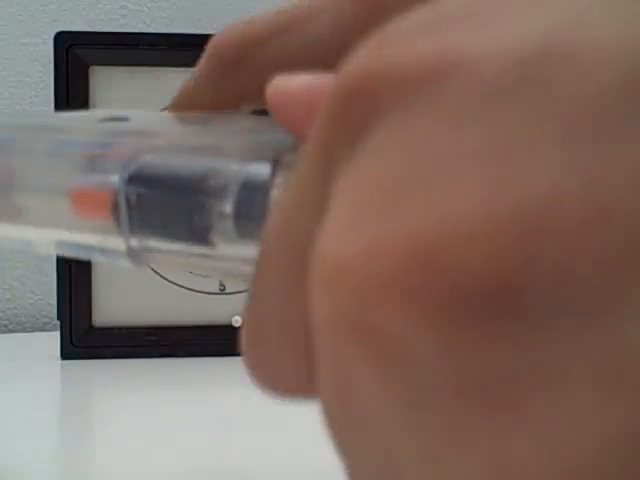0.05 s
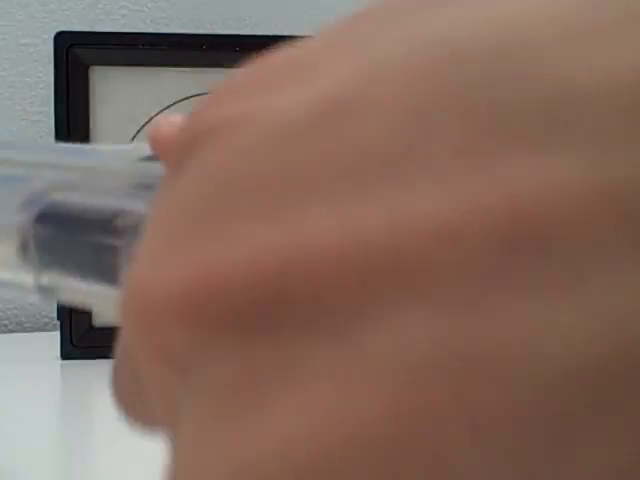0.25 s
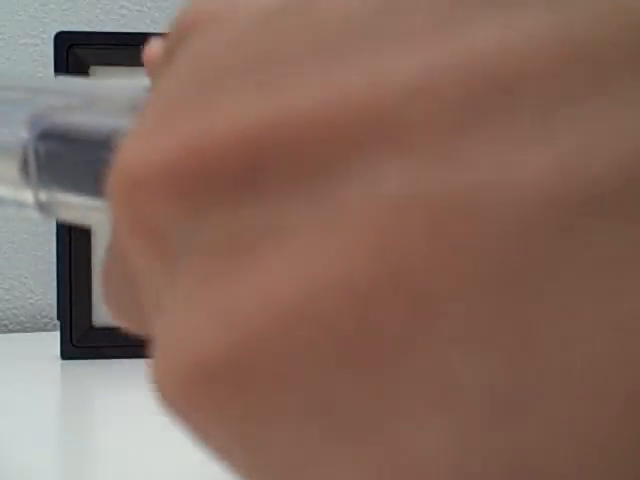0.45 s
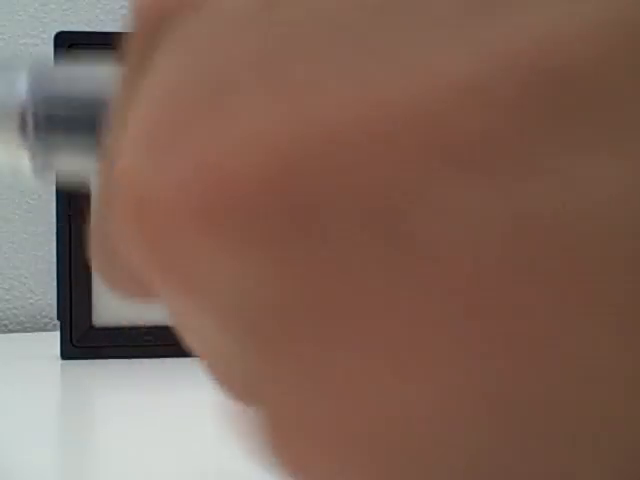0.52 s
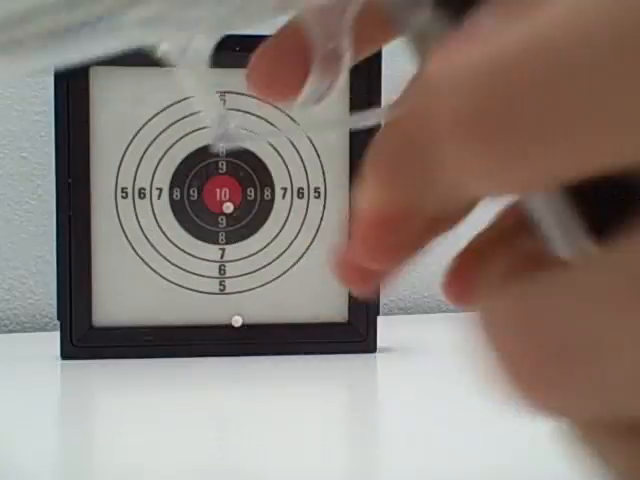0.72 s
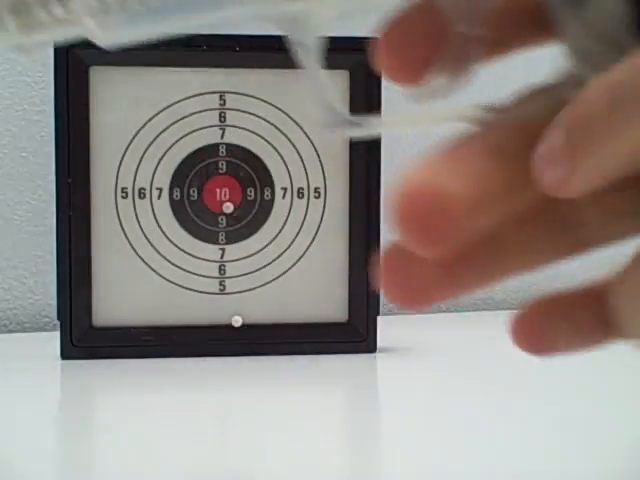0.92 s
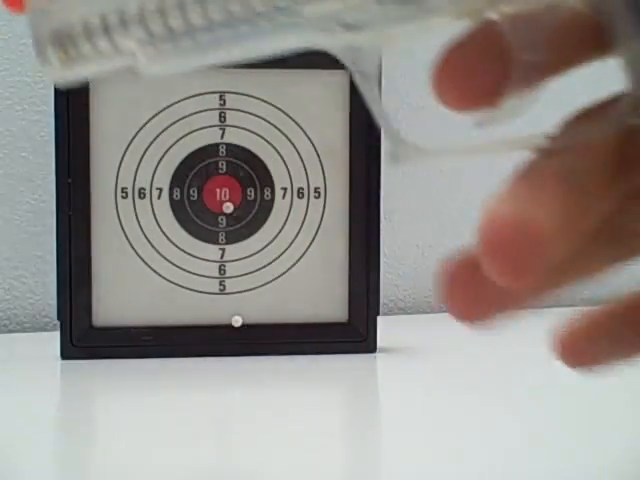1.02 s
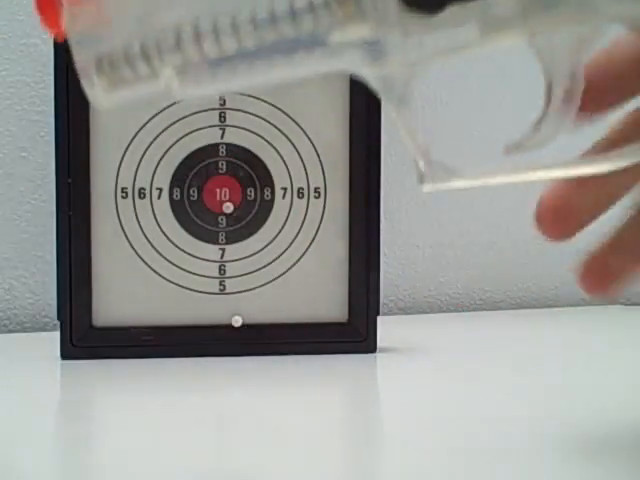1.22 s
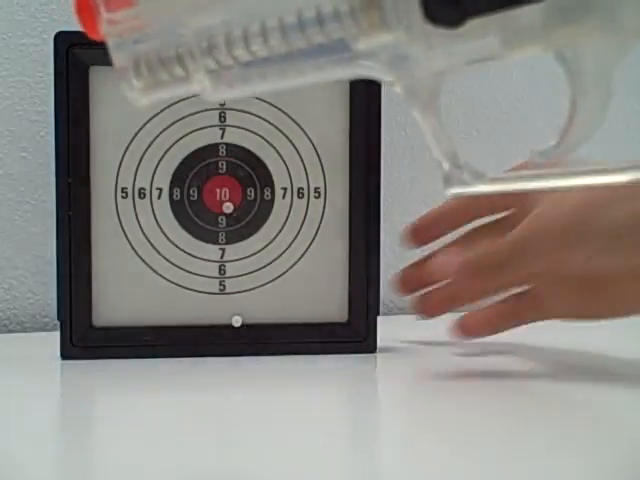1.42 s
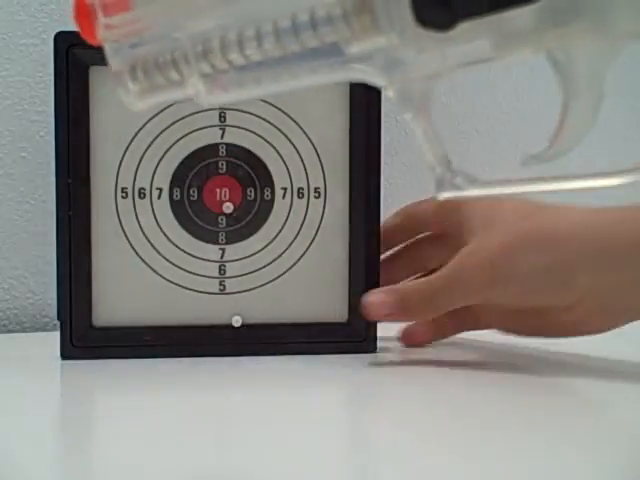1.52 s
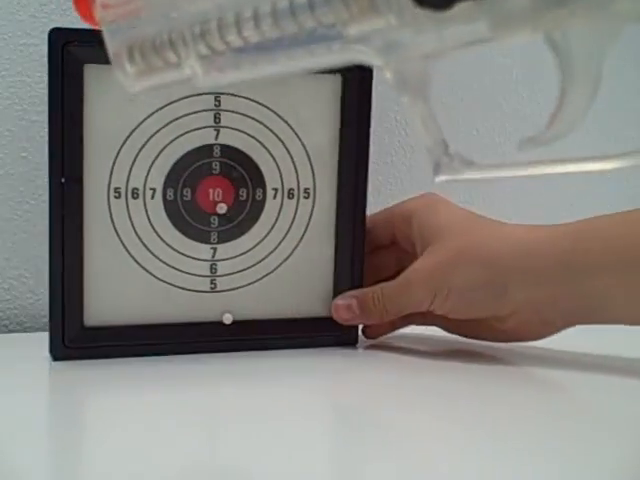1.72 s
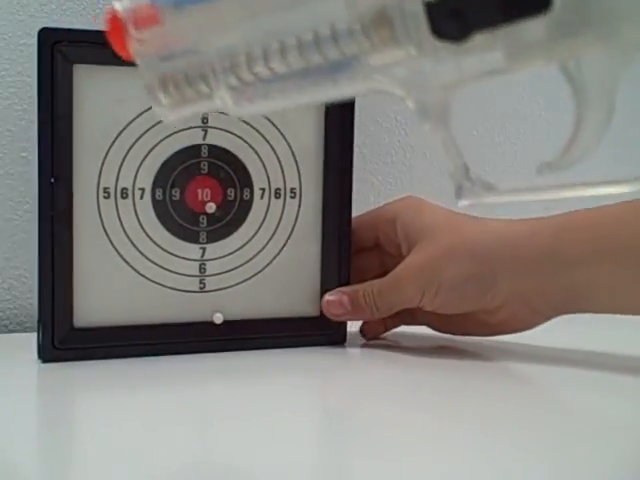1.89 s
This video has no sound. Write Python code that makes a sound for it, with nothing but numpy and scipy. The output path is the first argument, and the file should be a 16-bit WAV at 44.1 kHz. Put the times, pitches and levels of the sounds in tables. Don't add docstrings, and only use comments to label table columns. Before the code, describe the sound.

Close up in a small furnished room, a toy pistol's slide scrapes and snaps sharply, then plastic ticks and skin rubs quietly; finally a light box stutters dully over the table, above faint hiss and hum.

```python
import sys
import numpy as np
from scipy import signal
from scipy.fft import rfft, irfft
from scipy.io import wavfile
from scipy.ndimage import uniform_filter1d

SR = 44100
rng = np.random.default_rng(int(sys.argv[2]) if len(sys.argv) > 2 else 0)


def undo_db(level):
    steps = np.asarray(level, float) / 20
    return 10 ** steps


def transcribe(signal):
    frames = np.atleast_2d(signal).T
    limited = np.clip(frames, -1, 1)
    pcm = np.round(limited * 32767).astype(np.int16)
    wavfile.write(sys.argv[1], SR, pcm)


N = 85995
t = np.arange(N) / SR

# (frequency [Hz], level [dB])
AIR_HISS = [(15, -34), (25, 0.5), (123, -9), (235, -13), (461, -18), (834, -24.5), (1820, -31), (2730, -31),
            (15800, -40.5)]
AIR_HISS_DB, HISS_CUT_HZ = -57, 16000
HUM_HZ, HUM_DB, HUM_WIDTH_HZ = 120, -61, 6
WHINE_HZ, WHINE_DB = 15100, -91
# (frequency [Hz], level [dB], width [Hz])
MURMURS = [(466, -69, 31), (2000, -74, 750), (1818, -85.5, 22)]
# (frequency [Hz], level [dB per Hz])
EARLIER_CLICK = [(290, -40.5), (500, -16.5), (631, -7.5), (3440, 0), (3750, -1), (11000, -8.5),
                 (16000, -17.5)]
EARLIER_DB, EARLIER_T60_S = -44, 0.38

# (frequency [Hz], t60 [s])
ROOM_DECAY = [(200, 0.6), (1000, 0.3), (2000, 0.36), (6000, 0.38), (10000, .32), (16000, 0.27)]
# (frequency [Hz], level [dB])
ROOM_COLOUR = [(200, -13.5), (600, -3), (1050, 0.5), (1600, -2), (4000, -3), (9000, -2.5), (16000, -0.5)]
ROOM_DB, ROOM_RISE_S = -18, .008

# (time [s], level [dB], frequency [Hz])
JOLTS = [
    (0.067, -39.5, 40),
    (0.268, -38, 34.4),
    (0.273, -45, 89),
    (1.595, -47.5, 35),
    (1.72, -43, 35),
]

# (three times [s], in any order: the
# earliest is the start, # then peak, then end; level [dB rms], centre [Hz])
DRIFT = [(1.186, 1.354, 1.42, -63.5, 473), (1.416, 1.46, 1.56, -62.5, 452), (1.2, 1.33, 1.458, -73.5, 2150),
         (1.41, 1.47, 1.54, -74.5, 2400), (1.2, 1.36, 1.6, -70.5, 685), (0.88, 0.89, 0.99, -64, 730),
         (1.04, 1.08, 1.255, -66.5, 1200), (1.09, 1.186, 1.2, -64.5, 958), (1.97, 1.84, 1.92, -60.5, 720),
         (1.9, 1.86, 1.91, -55.5, 330)]
DRIFT_T60_S = .04

# (frequency [Hz], level [dB], t60 [s])
BOX_PANELS = [(160, -3.5, 0.11), (272, -7.5, .04), (361, -5, 0.099), (471, -6, 0.059), (579, -5, 0.019),
              (690, -5, 0.019), (840, -11, 0.024), (1068, -6, 0.032), (1330, -18, 0.021),
              (2000, -12.5, 0.03), (2790, -13, 0.0084), (4460, -18, 0.026)]
# (time [s], peak [dB], frequency [Hz], swell [s], t60 [s])
BOX_BUMPS = [(1.684, -33, 270, .025, .055), (1.680, -42, 480, .02, .05), (1.698, -28, 466, .03, .05),
             (1.7135, -29, 268, .015, .05), (1.689, -40, 1090, .03, .06), (1.737, -35, 280, .03, .07),
             (1.766, -36, 282, .015, .045), (1.782, -53, 1030, .02, .05), (1.728, -39, 440, .02, .04),
             (1.720, -41, 710, .02, .05)]
NUDGE_S, NUDGE_PEAK_S, NUDGE_END_S = 1.6627, 1.712, 1.728
NUDGE_DB, NUDGE_HISS_DB, NUDGE_FADE_S = -37, -40.5, 0.19
SLIPS_PER_S, SETTLE_S, SETTLE_DB, BOX_LOW_CUT_HZ = 900, 1.795, -50, 200
TABLE_DB, TABLE_T60_S, TABLE_HZ = -14.5, 0.41, 676

# (start [s], peak [s], end [s], level [dB rms], centre [Hz])
STROKES = [(.066, .080, .092, -43, 2000), (.199, .228, .238, -33, 1700), (.236, .250, .260, -31, 2000),
           (.2585, .2600, .2680, -19, 5000), (.2665, .2710, .2790, -22, 7000),
           (.2020, .2075, .2125, -33, 8500), (.594, .612, .640, -52, 1500), (.604, .620, .632, -53, 7000),
           (.770, .783, .793, -43, 2200), (.548, .565, .578, -59, 7000), (1.660, 1.675, 1.70, -53, 2600),
           (.700, .712, .760, -57, 2300)]
# (start [s], peak [s], end [s], level [dB rms], centre [Hz])
SKIN = [(1.055, 1.075, 1.19, -63, 5080), (1.055, 1.08, 1.12, -59, 15150), (1.115, 1.145, 1.184, -50, 6300),
        (1.115, 1.145, 1.184, -54, 8300), (1.12, 1.145, 1.154, -55, 14200),
        (1.125, 1.147, 1.156, -52.5, 2570), (1.055, 1.07, 1.10, -65.5, 1400),
        (1.07, 1.13, 1.154, -57.5, 4160)]
RUB_PER_S, RUB_SPREAD_DB, RUB_FLUTTER_DB, RUB_FLUTTER_S = 7000, 1.5, 2.5, .005
RUB_WIDTH, RUB_OPEN_DB = 0.41, -15.5
SKIN_WIDTH, SKIN_OPEN_DB, SKIN_PATCH_DB, SKIN_PATCH_S = .08, -14, 2.5, .012

# (time [s], peak [dB], frequency [Hz], swell [s], t60 [s])
SHELL_KNOCKS = [(.1312, -17.5, 1100, .003, .006), (.1346, -28, 1300, .003, .01),
                (.1300, -32, 450, .003, .005), (.1385, -42, 1250, .004, .02), (.2380, -15, 1800, .003, .03),
                (.2793, -3.5, 1690, .003, .022), (.2800, -11, 1200, .003, .022),
                (.2350, -34, 480, .004, .012), (.2840, -17, 1550, .003, .03),
                (.2606, -18, 1320, .002, .015), (.7772, -31, 3600, .001, .005),
                (.6983, -21.5, 818, .005, .018), (.7052, -35, 950, .004, .01), (.7100, -54, 830, .01, .15),
                (.7775, -41, 260, .005, .015)]
# (frequency [Hz], level [dB], t60 [s])
COIL = [(1730, -38.5, 0.27), (8330, -46, .35), (2160, -40, .25), (1400, -39, 0.62), (1060, -43.5, 0.2)]
SNAP_S = .2795

# (time [s], peak [dB], shell ring [Hz], crack against the ring [dB], chatter [s])
HANDLING = [(.5610, -72, 6000, 8.5, 0.002), (.5720, -65, 8530, -5, 0.0019), (.5932, -46, 2710, 6, 0.0026),
            (.6112, -34.5, 1287, -2.5, 0.0044), (.6280, -37.5, 854, -8, 0.0026),
            (.6355, -49, 5100, 9.5, .002), (.6983, -33, 2410, 0, 0.0021), (.7120, -62, 9000, -2, .001),
            (.6530, -57, 12000, 0, .001), (.6820, -58, 8000, 3, .001), (.7385, -49, 2260, -17, .004),
            (.7772, -35, 3500, 8.5, 0.00084), (.7770, -35, 9000, -8, 0.0011), (.7815, -35, 6500, 3, 0.0012),
            (.7780, -35, 585, -7.5, 0.00089), (.7818, -30.5, 1400, -1, 0.0039),
            (.8282, -43.5, 2270, 4, 0.0029), (.8560, -60, 8920, -4, .002), (.8876, -38.5, 2440, 5, 0.00093),
            (.8915, -40, 744, -16, 0.0017), (.9138, -45, 1360, 0.5, 0.0014),
            (.9623, -36.5, 612, 11, 0.00042), (.9640, -43, 1410, -8, 0.0025),
            (1.0832, -59, 1274, 16, 0.00077), (1.1790, -46.5, 610, 2.5, 0.0021)]
# (time [s], peak [dB], shell ring [Hz], crack against the ring [dB], chatter [s])
SLIDE = [(.0760, -33.5, 1410, 4.5, 0.0017), (.0815, -33.5, 1570, 5, 0.0045),
         (.0905, -41.5, 5730, -3.5, 0.0026), (.1312, -35.5, 4200, 2.5, 0.002),
         (.2060, -22, 7050, -0.5, 0.0021), (.2342, -23, 2450, 1.5, 0.0011),
         (.2357, -11.5, 2900, 2.5, 0.00056), (.2368, -9.5, 2308, 1, 0.0006),
         (.2592, -9.5, 2050, 0.5, 0.0029), (.2612, -11.5, 6000, 0, .001), (.2632, -10, 10300, -0.5, .0015),
         (.2662, -10.5, 6000, -1, .001), (.2695, -14.5, 10500, -2, .0015),
         (.2730, -11, 11500, -0.5, 0.0018), (.2790, -9, 2800, 3, 0.0022),
         (.2820, -12.5, 3294, -1.5, 0.0022)]
# (frequency [Hz], width [Hz], level [dB])
SHELL = [(2750, 820, 1.5), (3434, 580, -2.5), (4210, 110, -10.5), (4950, 280, -8.5), (5697, 180, -12),
         (6250, 250, -11), (7787, 440, -6), (11220, 770, -15.5), (13900, 700, -16.5), (15580, 530, -22)]
SHELL_WIDEN, SHELL_SCATTER_DB = 2, 2
RING_S, RING_CORNER_HZ, CHATTER_LOSS_DB = .011, 3000, 10.0
CRACK_T60_S, CRACK_DULL, BARE_CRACK_DB = .005, 0.18, -1.5
RATTLE_DB, RATTLE_T60_S, RATTLE_HZ = -0.5, 0.048, 3500
SHELL_LOW_CUT_HZ, GRIP_LOW_CUT_HZ, GRIP_HIGH_CUT_HZ = 744, 340, 9200


def rms_one(x):
    return x / np.sqrt(np.mean(x ** 2) + 1e-20)


def peak_one(x):
    return x / np.abs(x).max()


def filtered(x, order, hz, kind):
    return signal.sosfilt(signal.butter(order, hz, kind, fs=SR, output="sos"), x)


def at_hz(points, hz):
    table = np.array(points)
    return np.interp(np.log(hz), np.log(table[:, 0]), table[:, 1])


def ring(clicks, hz, t60):
    r, w = undo_db(-60 / (t60 * SR)), 2 * np.pi * hz / SR
    return signal.lfilter([0, np.sin(w)], [1, -2 * r * np.cos(w), r * r], clicks + 1e-18)


def noise_ring(hz, t60):
    return rms_one(ring(rng.standard_normal(N), hz, t60))


def coloured(spectrum):
    hz = np.maximum(np.arange(N // 2 + 1) * SR / N, 1)
    gain = undo_db(at_hz(spectrum, hz)) * (hz < HISS_CUT_HZ)
    return rms_one(irfft(rfft(rng.standard_normal(N)) * gain, N))


def grains(per_s, spread_db):
    size = undo_db(spread_db * np.minimum(rng.exponential(1, N), 4)) * rng.choice([-1, 1], N)
    return rms_one(size * (rng.random(N) < per_s / SR))


def swell(start, peak, end):
    start, peak, end = np.sort([start, peak, end])
    sag = end - (end - peak) / 6
    return np.interp(t, [start, peak, sag, end], [0, 1, .45, 0])


def background():
    hiss = undo_db(AIR_HISS_DB) * coloured(AIR_HISS)
    hum = undo_db(HUM_DB) * noise_ring(HUM_HZ, 2.2 / HUM_WIDTH_HZ)
    whine = undo_db(WHINE_DB) * noise_ring(WHINE_HZ, 0.018)
    murmur = sum(undo_db(db) * noise_ring(hz, 1.0 / width) for hz, db, width in MURMURS)
    earlier = undo_db(EARLIER_DB - 60 * t / EARLIER_T60_S) * coloured(EARLIER_CLICK)
    return hiss + hum + whine + murmur + earlier


def room(x):
    edges = np.geomspace(120, 17000, num=36)
    tail, u = 0, t[:SR // 2]
    for low, high in zip(edges, edges[1:]):
        hz = np.sqrt(low * high)
        band = filtered(rng.standard_normal(len(u)), 2, [low, high], "band")
        tail = tail + band * undo_db(at_hz(ROOM_COLOUR, hz) - 60 * u / at_hz(ROOM_DECAY, hz))
    tail = tail * (1 - np.exp(-u / ROOM_RISE_S))
    return signal.fftconvolve(x, undo_db(ROOM_DB) * tail / np.sqrt(np.sum(tail ** 2)))[:N]


def jolts():
    out = 0
    for s, db, hz in JOLTS:
        window = np.sin(np.pi * np.clip(hz * (t - s), 0, 1))
        out = out + undo_db(db) * np.sin(2 * np.pi * hz * (t - s)) * window
    return out


def drift():
    return sum(undo_db(db) * swell(start, peak, end) * noise_ring(hz, DRIFT_T60_S)
               for start, peak, end, db, hz in DRIFT)


def knocks(rows):
    out, span = np.zeros(N + SR), SR // 3
    click = np.r_[1., np.zeros(span - 1)]
    for s, db, hz, rise, t60 in rows:
        body = filtered(ring(ring(click, hz, rise), hz, t60), 2, hz / 2, "high")
        i = int(s * SR)
        out[i:i + span] += undo_db(db) * peak_one(body)
    return out[:N]


def box():
    push = swell(NUDGE_S, NUDGE_PEAK_S, NUDGE_END_S)
    slips = push ** 0.7 * grains(SLIPS_PER_S, 3.5)
    rock = np.exp(-((t - SETTLE_S) / 0.0048) ** 2) * rng.standard_normal(N)
    panels = sum(undo_db(db) * ring(slips, hz, t60) for hz, db, t60 in BOX_PANELS)
    settle = sum(undo_db(db) * ring(rock, hz, t60) for hz, db, t60 in BOX_PANELS[:6])
    fade = np.where(t < NUDGE_PEAK_S, push ** 1.15, undo_db(-60 * (t - NUDGE_PEAK_S) / NUDGE_FADE_S))
    hiss = fade * filtered(grains(4000.0, 4.0), 2, [900, 5000], "band")
    near = undo_db(NUDGE_DB + 13.5) * peak_one(panels) + undo_db(SETTLE_DB) * peak_one(settle)
    near = filtered(near + undo_db(NUDGE_HISS_DB) * hiss, 4, BOX_LOW_CUT_HZ, "high")
    boom = filtered(rng.standard_normal(SR // 2), 2, TABLE_HZ, "low") * undo_db(-60 * t[:SR // 2] / TABLE_T60_S)
    table = signal.fftconvolve(near, undo_db(TABLE_DB) * boom / np.sqrt(np.sum(boom ** 2)))[:N]
    return near + knocks(BOX_BUMPS) + table


def wander(depth_db, smooth_s):
    return undo_db(depth_db * rms_one(uniform_filter1d(rng.standard_normal(N), int(smooth_s * SR))))


def rubbing(strokes, width, open_db, patch_db):
    out = 0
    for start, peak, end, db, hz in strokes:
        flutter = wander(RUB_FLUTTER_DB, RUB_FLUTTER_S)
        slips = filtered(flutter * grains(RUB_PER_S, RUB_SPREAD_DB), 3, 800, "high")
        band = [hz / (1 + width), min(hz * (1 + width), .45 * SR)]
        tuned = rms_one(filtered(slips, 1, band, "band"))
        patch = wander(patch_db, SKIN_PATCH_S)
        out = out + undo_db(db) * swell(start, peak, end) * (patch * tuned + undo_db(open_db) * slips)
    return out


def spring():
    since = t - SNAP_S
    return sum(undo_db(db - 60 * since / t60) * (since > 0) * noise_ring(hz, 0.023) for hz, db, t60 in COIL)


def upper_modes(touch):
    out = 0
    for k, (hz, width, db) in enumerate(SHELL):
        level = undo_db(db + SHELL_SCATTER_DB * rng.standard_normal())
        out = out + (-1) ** k * level * ring(touch, hz, 2.2 / (width * SHELL_WIDEN))
    return out


def contacts(rows, cut_hz):
    out, span = np.zeros(N + SR), SR // 8
    u = t[:span]
    for s, db, hz, crack_db, chatter in rows:
        when = np.r_[0, np.sort(rng.random(5))]
        sizes = undo_db(-CHATTER_LOSS_DB * when) * np.r_[1, rng.choice([-1, 1], 5)]
        touch = np.zeros(span)
        np.add.at(touch, (when * chatter * SR).astype(int), sizes)
        t60 = RING_S / (1 + (hz / RING_CORNER_HZ) ** 2)
        body = ring(ring(touch, hz, t60), hz, t60)
        loss_db = 60 * np.maximum(u - chatter, 0) / CRACK_T60_S + CHATTER_LOSS_DB * np.minimum(u / chatter, 1)
        burst = signal.lfilter([1], [1, -CRACK_DULL], rng.standard_normal(span) * undo_db(-loss_db))
        rattle = rng.standard_normal(span) * undo_db(RATTLE_DB - 60 * u / (RATTLE_T60_S + chatter))
        crack = peak_one(upper_modes(touch)) + undo_db(BARE_CRACK_DB) * peak_one(burst)
        crack = crack + filtered(rattle, 2, RATTLE_HZ, "low")
        i = int(s * SR)
        out[i:i + span] += undo_db(db) * (peak_one(body) + undo_db(crack_db) * crack)
    return filtered(out[:N], 3, cut_hz, "high")


def scene():
    slide = contacts(SLIDE, SHELL_LOW_CUT_HZ)
    handling = filtered(contacts(HANDLING, GRIP_LOW_CUT_HZ), 1, GRIP_HIGH_CUT_HZ, "low")
    pistol = slide + handling + spring() + knocks(SHELL_KNOCKS)
    rubs = rubbing(STROKES, RUB_WIDTH, RUB_OPEN_DB, 0)
    skin = rubbing(SKIN, SKIN_WIDTH, SKIN_OPEN_DB, SKIN_PATCH_DB)
    near = pistol + rubs + skin + box() + drift()
    return (near + room(near) + jolts() + background())[None]


def low_pass(x):
    return signal.sosfilt(signal.butter(12, 16970, fs=SR, output="sos"), x)


def record(dry):
    x = signal.sosfilt(signal.cheby2(14, 60, 16600, fs=SR, output="sos"), dry)
    ceiling = .8
    mix = x / (1 + np.abs(x / ceiling) ** 6) ** (1 / 6)
    return low_pass(mix)


dry = scene()
out = record(dry)
transcribe(out)
```